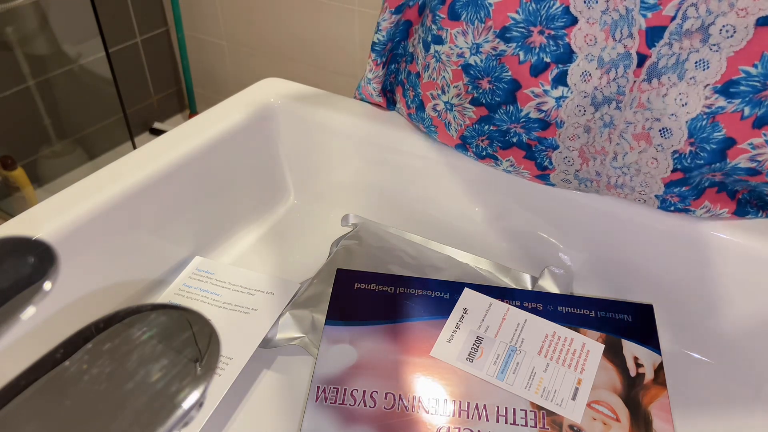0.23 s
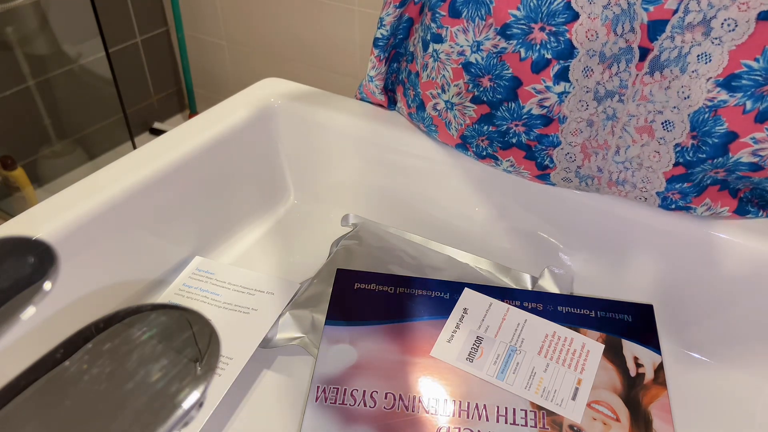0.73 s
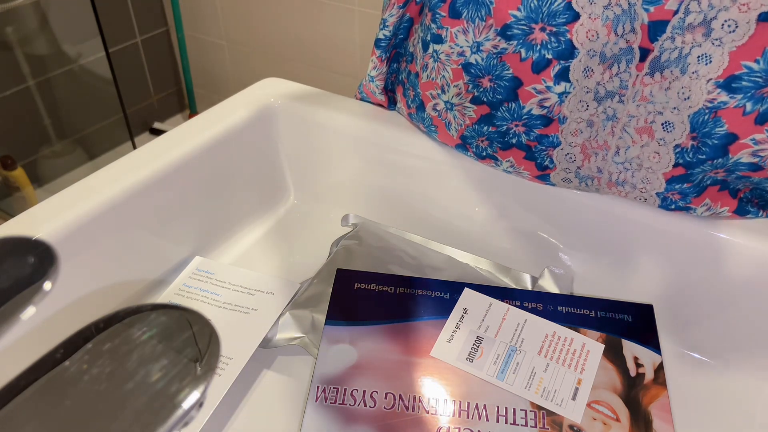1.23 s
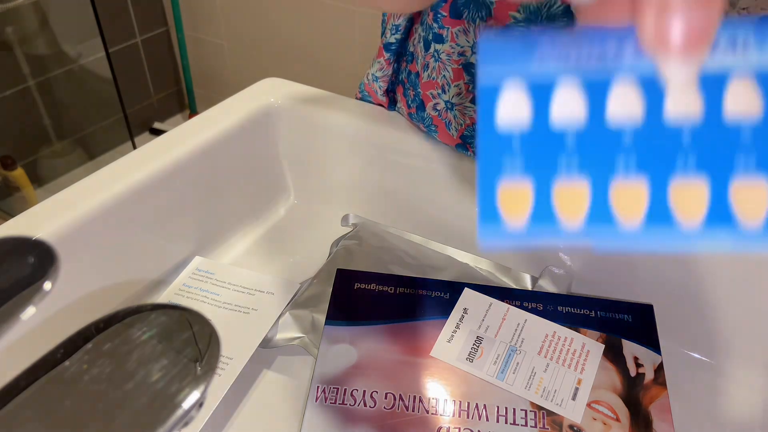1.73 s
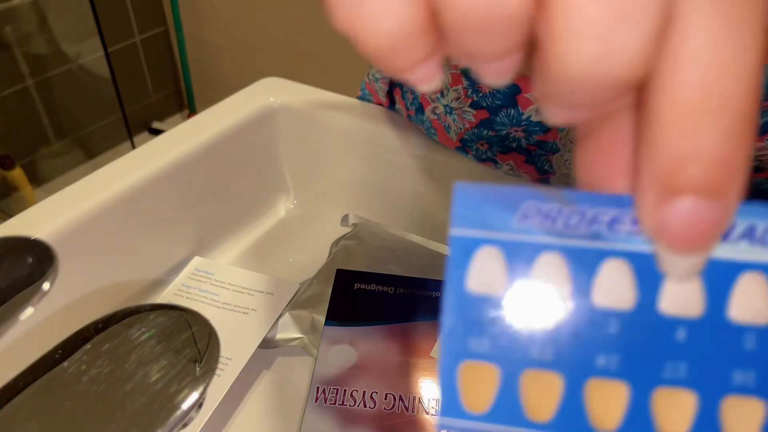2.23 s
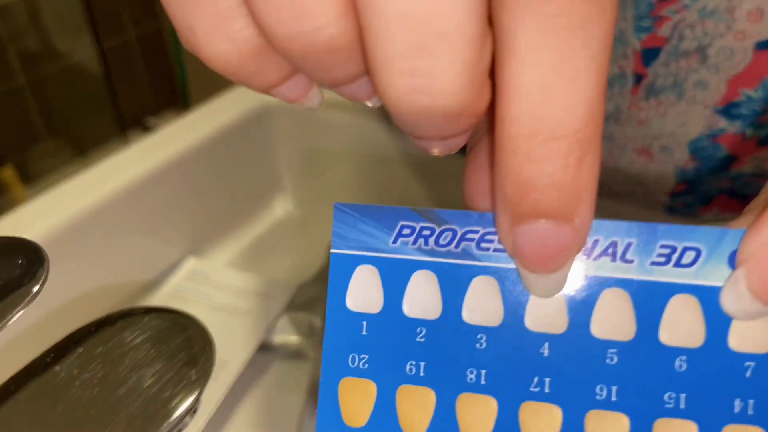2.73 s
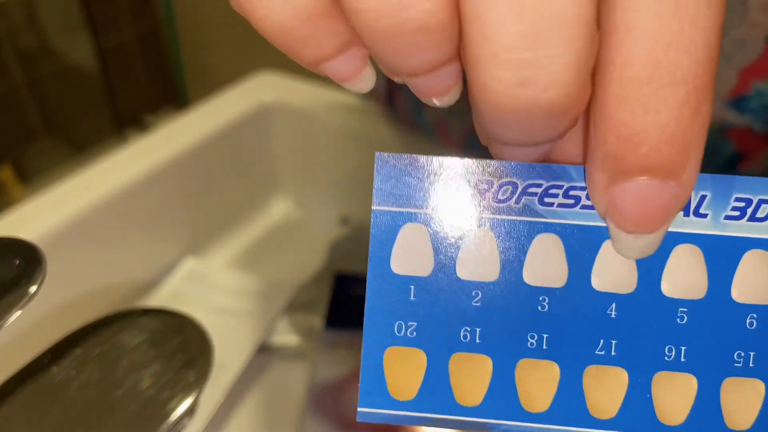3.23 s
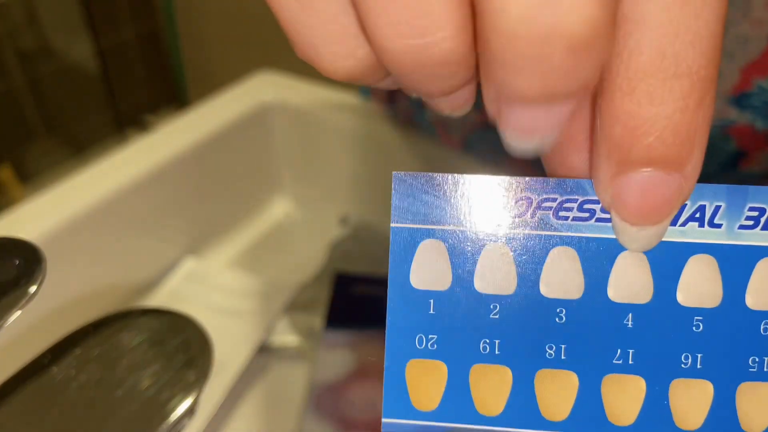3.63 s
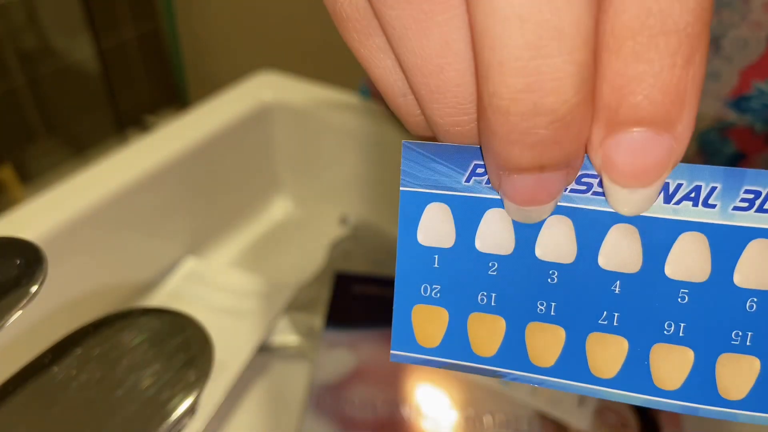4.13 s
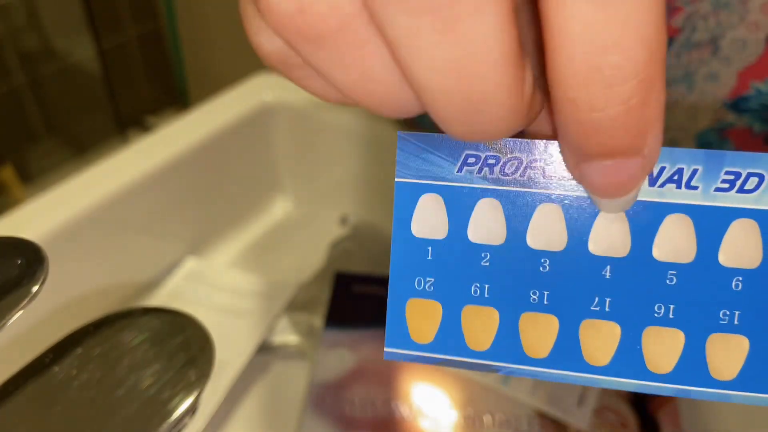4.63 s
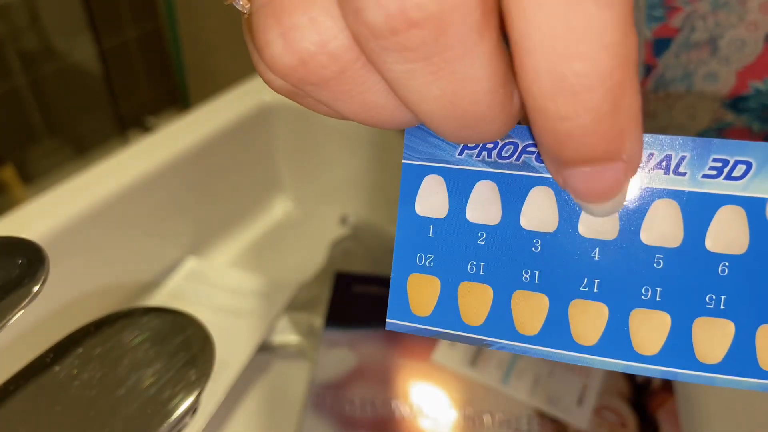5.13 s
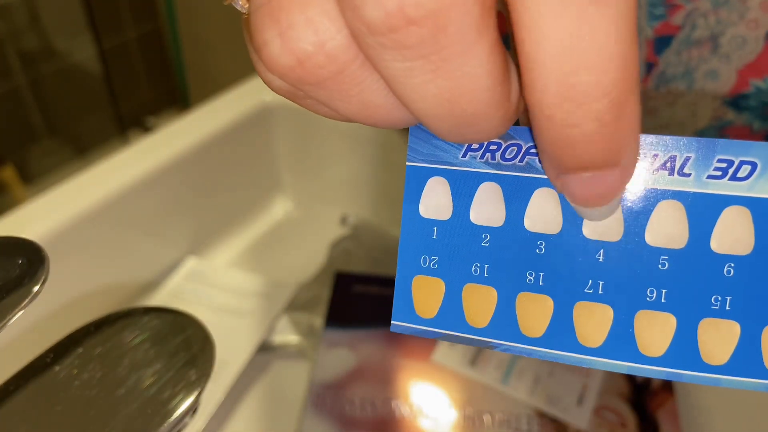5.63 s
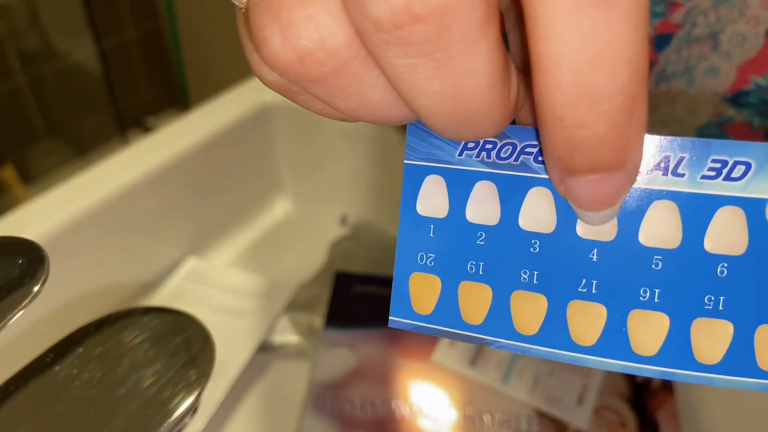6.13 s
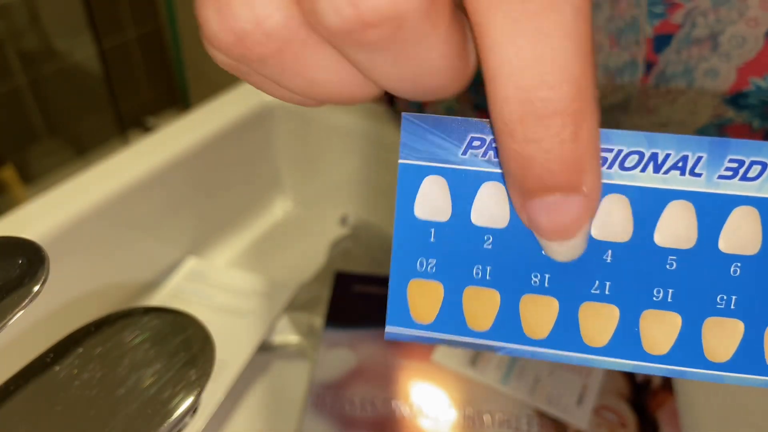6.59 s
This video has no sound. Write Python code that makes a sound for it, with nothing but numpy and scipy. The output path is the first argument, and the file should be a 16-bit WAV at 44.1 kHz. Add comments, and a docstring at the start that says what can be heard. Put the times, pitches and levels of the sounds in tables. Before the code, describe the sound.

An extractor fan runs throughout in a small tiled bathroom: a low, gently fluttering hum, soft rushing air and a faint steady whine. Very near the stereo microphones, skin brushes a thin plastic card in tiny grainy scuffs from 0.1 to 0.8 seconds, with a small tick near 0.45. A lone tick comes at 1.5, a faint rub at 1.7. Around 2.9 to 3.5 there are more sticky ticks and short hisses, then at 3.58 a clicking tap with the heaviest dull knock and low thud. Small crackles follow until 3.9, and brief brighter rubs around 4.0 and 4.3 to 4.5. From 4.86 to 6.2 a fingernail taps eight times, roughly every 0.15 to 0.2 seconds: dry, bright snaps, mostly with faint knocks, the last strongest. The hard walls answer briefly. Light rubbing and ticks at 6.4 to 6.65, then only fan until nearly 7.

```python
"""In a small tiled bathroom an extractor fan rushes and hums: noise rings the room's modes, the blades whine faintly.
Close to a two-microphone recorder, skin slides on a thin plastic card as grainy hiss, with crackling stick-slip ticks.
A nail taps the card ten times, a broadband snap with decaying bending modes; most taps add a duller knock and thud.
The tiles answer the card with decaying noise."""
import sys
import numpy as np
from scipy import signal
from scipy.fft import rfft, irfft, next_fast_len
from scipy.io import wavfile
from scipy.ndimage import uniform_filter1d, map_coordinates

SR = 44100
rng = np.random.default_rng(int(sys.argv[2]) if len(sys.argv) > 2 else 0)


def unload_audio(sound):
    """Save the sound as a 16-bit wav file, at the path given as the first command line argument."""
    columns = np.transpose(np.atleast_2d(sound))
    # keep every value between -1 and 1, then stretch to whole-number steps
    steps = np.round(np.clip(columns, -1, 1) * 32767)
    wavfile.write(sys.argv[1], SR, steps.astype(np.int16))


N = 302289  # length in samples


def amp(db):
    """Decibel law: a level in dB becomes an amplitude ratio."""
    return 10 ** (np.asarray(db) / 20)


def unit(x):
    """Normalization by mean power: x scaled to rms 1."""
    return x / np.sqrt(np.mean(x ** 2) + 1e-20)


def along(points, hz, axis=1):
    """Logarithmic frequency scale: one column of (Hz, value, ..) points interpolated at hz."""
    columns = np.transpose(points)
    return np.interp(np.log(hz + 1), np.log(columns[0] + 1), columns[axis])


def wobble(rate):
    """Band-limited fluctuation: a smooth curve through `rate` random knots a second."""
    knots = rng.standard_normal(int(N * rate / SR) + 4)
    return map_coordinates(knots, [np.arange(N) * rate / SR])


def filtered(x, response):
    """Linear filtering: the spectrum of x times a complex response of frequency."""
    m = next_fast_len(x.shape[-1] + SR // 2)  # room for the filter to ring out
    spectrum = rfft(x, m) * response(np.fft.rfftfreq(m, 1 / SR))
    return irfft(spectrum, m)[..., :x.shape[-1]]


def air(patchy_db=1.5, ripple=0.54):
    """Turbulence noise, partly coherent between the microphones; the tiled walls comb it finely."""
    # Each row: frequency in Hz, left and right level in dB per Hz before patches and comb.
    air_levels = [(27.5, -100, -100), (35.8, -77.5, -79.5), (117, -75, -73), (318, -72.5, -71),
                  (640, -76.5, -82), (1234, -92, -91.5), (2140, -99, -99), (2850, -100, -101),
                  (3580, -105, -106), (4380, -103, -105), (5000, -107, -109), (6240, -110, -111),
                  (6920, -116, -116), (8750, -120, -120), (10800, -118, -118), (12500, -121, -121),
                  (15000, -126, -126), (16200, -140, -140)]
    # Left-right coherence of the air noise. Each row: frequency in Hz, correlation from -1 to 1.
    likeness = [(60, 0.95), (250, 1), (600, -0.44), (1200, -0.42), (1800, -0.14), (2800, 0.35),
                (4500, 0.54), (5600, -0.017)]

    # faint patches of level in time and frequency
    z = signal.stft(rng.standard_normal((2, N)), nperseg=512)[2]
    field = uniform_filter1d(rng.standard_normal(z.shape[1:]), 6, 0)
    field = uniform_filter1d(field, 14, 1)
    pair = signal.istft(z * amp(patchy_db * unit(field)), nperseg=512)[1][:, :N]

    def mid_side(hz):
        angle = np.arccos(np.clip(along(likeness, hz), -1, 1)) / 2
        return np.array([np.cos(angle), np.sin(angle)])

    knots = rng.standard_normal((2, 2000))  # one knot every 12 Hz

    def comb(hz):
        depth_db = 10 * ripple * np.interp(hz, [0, 1500, 6000], [0, 1, .3])
        return amp(depth_db * [np.interp(hz / 12, np.arange(2000), k) for k in knots])

    def colour(hz):
        level = amp([along(air_levels, hz), along(air_levels, hz, axis=2)])
        return level * np.sqrt(SR / 2) * comb(hz)

    mid, side = filtered(pair, mid_side)
    return filtered(np.array([mid + side, mid - side]), colour)


def room_modes():
    """Resonance under random excitation: each mode is narrow noise, with its own level and phase at each microphone."""
    # Each row: frequency in Hz, width in Hz at half amplitude, left and right level in dB,
    # right-channel phase lead in radians.
    modes = [(90, 18, -82, -74, 1), (158.9, 8.3, -54, -52.5, -0.5), (205.1, 11.7, -53.5, -50, -1.34),
             (239, 16, -48, -44.5, 0.72), (274.4, 6.6, -53, -54, 0.52), (305.4, 17, -54.5, -59.5, 1.5),
             (324.9, 21, -57, -46.5, 0), (351.8, 10.4, -62.5, -52.5, 0.2),
             (376.5, 17.4, -53.5, -50.5, -0.63), (401.3, 11, -55, -60, -2), (420.7, 19, -58, -55, -2),
             (451.3, 22, -53.5, -57.5, 0.4), (469.4, 13, -51, -58.5, 0.97), (503.7, 7.1, -54.5, -52, -2.5),
             (528, 21, -52.5, -60.5, 4.5), (565, 38, -56, -64, -2.5), (677.3, 39, -55.5, -57, 1.5),
             (710, 12, -64, -64, 3), (774.6, 75, -55, -55.5, 1.19), (850, 19, -63, -72, -2),
             (885.5, 13, -66, -62.5, 1.5), (954, 14, -62, -63.5, 1.5), (981, 17, -69, -69.5, 1),
             (1096, 51, -66.5, -68.5, 1.5), (1227, 18, -78.5, -80.5, 1.5)]
    # Resonances of the fan housing, columns as above.
    housing = [(1796, 140, -72, -75.5, 0.63), (2483, 110, -74, -76, 0.14), (3020, 81, -86, -84.5, 0.16),
               (4264, 170, -74.5, -81, 0.022), (4655, 41, -81.5, -83, 0.39)]
    m = next_fast_len(N)
    f = np.fft.rfftfreq(m, 1 / SR)[:m // 6]
    total = np.zeros((2, m // 2 + 1), complex)
    for hz, width_hz, left_db, right_db, lead in modes + housing:
        shape = 1 / (1 + (2 * (f - hz) / width_hz) ** 2)
        noise = shape * (rng.standard_normal(len(f)) + 1j * rng.standard_normal(len(f)))
        noise *= m / 2 / np.linalg.norm(shape)  # rms 1
        total[:, :len(f)] += noise * [[amp(left_db)], [amp(right_db) * np.exp(1j * lead)]]
    return irfft(total, m)[:, :N]


def hum(hz, rate, left_db, right_db, lead):
    """Narrow-band noise: a room mode rung by noise is a sine whose size and phase drift together."""
    envelope = wobble(rate) + 1j * wobble(rate)
    ring = envelope * np.exp(2j * np.pi * hz * np.arange(N) / SR)
    return amp([[left_db], [right_db]]) * unit(np.real([ring, ring * np.exp(1j * lead)]))


def tone(hz, wander_hz, left_db, right_db, lead, rate):
    """Frequency modulation: a stereo sine of wandering pitch, its levels rms."""
    phase = 2 * np.pi * np.cumsum(hz + wander_hz * wobble(rate)) / SR
    return np.sqrt(2) * amp([[left_db], [right_db]]) * np.sin([phase, phase + lead])


def fan():
    """Superposition of fan sources: air noise, room modes, two fluttering hums and the blade tone."""
    # Slow level of the two hums. Each row: time in seconds, lower hum in dB, upper hum in dB.
    hum_levels = [(0, -45.5, -42), (1, -44, -40), (1.5, -46, -40.5), (2.7, -48.5, -45), (3.5, -47, -46),
                  (4, -41, -38), (4.6, -45.5, -40), (5.4, -45.5, -43), (6.1, -44.5, -43.5),
                  (6.85, -44, -38.5)]
    # Each row: frequency in Hz, random knots per second, left and right gain in dB,
    # right-channel phase lead in radians.
    hum_tones = [(138.8, 9, -0.5, 0, 0.066), (219.7, 18, -2.5, 1.5, 0.28)]
    # One row: frequency in Hz, pitch wander in Hz, left and right level in dB, right-channel lead in radians.
    blade_tone = (659, 0.6, -49, -54, 1.97)
    t = np.arange(N) / SR
    times, *levels_db = np.transpose(hum_levels)
    hums = sum(amp(np.interp(t, times, db)) * hum(*row) for db, row in zip(levels_db, hum_tones))
    blade = amp(0.3 * wobble(2.8)) * tone(*blade_tone, rate=7.4)
    return air() + room_modes() + hums + blade


def rubs():
    """Stick-slip friction: skin catches and slips on the gloss, a grainy hiss under each stroke."""
    # Each row: start in seconds, length in seconds, level in dB, change in dB per second,
    # top treble in dB above the rest.
    strokes = [(0.117, .12, -77, -2, 0), (0.343, 0.098, -72, -86, -2), (0.445, 0.16, -65, -100, -8),
               (0.683, .1, -76, 0, -1), (1.71, .09, -70.5, -1.5, 3), (2.978, 0.037, -68, -200, 2),
               (3.07, 0.15, -66.5, -120, -2), (3.385, 0.093, -61, 5, -8), (3.477, .085, -67.5, -100, 0),
               (3.975, 0.09, -69.5, -70, 5), (4.32, 0.046, -53, 10, 4), (4.365, .018, -62, -100, -2),
               (4.4, .1, -63.5, -120, 0), (6.428, 0.036, -60.5, 0, 0), (6.462, 0.075, -65, 0, 0),
               (6.534, 0.028, -59, 0, 0), (6.562, .025, -66, -150, 0)]
    # Colour of the hiss. Each row: frequency in Hz, relative level in dB per Hz.
    skin_colour = [(1000, -21.5), (1900, 4.5), (2600, 8), (3200, 3.5), (4500, 6.5), (7000, 0.5), (11500, 1),
                   (15000, 0.5), (17000, -27.5)]
    rise_s, fall_s = .02, 0.0087  # start and end of a stroke
    grit_db, catch_db = 0.5, 1.5  # scatter of the grains' size, unevenness of the pressure
    snags_per_s, snag_size = 400, 7  # tiny snags in the hiss; size relative to the grain

    t, level = np.arange(N) / SR, np.zeros((2, N))
    for s, length, db, db_per_s, top_db in strokes:
        rise = (t - s) / rise_s + .5
        fall = (s + length - t) / fall_s + .5
        contact = np.clip(np.minimum(rise, fall), 0, 1) ** 2
        level += contact * amp(db + db_per_s * np.clip(t - s, 0, length)) * amp([[0], [top_db]])

    grain = amp(grit_db * wobble(500)) * rng.standard_normal(N)
    grain += snag_size * (rng.random(N) < snags_per_s / SR) * rng.standard_normal(N)
    hiss = unit(filtered(grain, lambda hz: amp(along(skin_colour, hz))))
    top = lambda hz: np.clip(hz / 1000 - 12.5, 0, 1)  # crossover centred on 13 kHz
    bands = filtered(hiss, lambda hz: np.array([1 - top(hz), top(hz)]))
    return amp(catch_db * wobble(120)) * (level * bands).sum(0)


def tiles(x):
    """Diffuse reverberation: noise tails decay at a rate set by frequency, a new tail every quarter second."""
    # Each row: frequency in Hz, time in seconds to decay by 60 dB.
    decay = [(500, 0.2), (3000, 0.47), (12000, 0.32)]
    out, step = np.zeros((2, N + SR)), SR // 4
    for start in range(0, N, step):
        hz, t, z = signal.stft(rng.standard_normal((2, SR // 2)), SR, nperseg=256)
        tail = signal.istft(z * amp(-60 * t / along(decay, hz)[:, None]), SR, nperseg=256)[1]
        wet = signal.fftconvolve(x[None, start:start + step], tail / np.linalg.norm(tail[0]), axes=1)
        out[:, start + 150:][:, :wet.shape[1]] += wet  # 150 samples of delay
    return out[:, :N]


def bend(hz):
    """Dispersion of bending waves in the card: the treble arrives first."""
    delay_s = .0007  # at 2500 Hz, falling with the root of frequency; half of it is then taken off everywhere
    return np.exp(-4j * np.pi * delay_s * np.sqrt(2500 * hz) + 2j * np.pi * hz * delay_s / 2)


def ticks():
    """Stick-slip release: skin lets go with a jolt and a short puff of crackle of its own colour and decay."""
    # Each row: time in seconds, level in dB, gain in dB at 3, 11 and 15 kHz relative to 6 kHz,
    # time in seconds to decay by 60 dB.
    releases = [(0.3393, -60.5, -6, 13, 17, 0.027), (0.445, -47, 3, -6, -12, 0.022),
                (1.479, -46, 12, -1, -1, .02), (2.897, -61, 0, 0, 6, .008),
                (3.0638, -41.5, 6, -9, -18, .004), (3.398, -49, 13, -2, -5, .014),
                (3.411, -56, 9, 6, -10, .01), (3.4649, -51, 2, 6, -14, .014), (3.5755, -49, -3, -4, 0, .01),
                (3.578, -36, -3, -5, -12, 0.016), (3.651, -47.5, 4, -1, 8, 0.011),
                (3.6648, -51, -6, -1, 6, .01), (3.8406, -48, 11, -6, -12, .004),
                (3.8592, -50, 16, -6, -22, 0.0055), (4.383, -49, 8, 7, 5, 0.0044),
                (4.424, -53, 14, -1, -1, .01), (6.553, -49, 2, -8, -6, .025), (6.638, -52, 2, -1, -7, .008)]
    jolt = 2.1  # over the rms of the crackle at its start
    out, lead = np.zeros(N + SR), 256  # samples of room ahead of the jolt
    t, hz = np.arange(4096 - lead) / SR, np.fft.rfftfreq(4096, 1 / SR)
    for s, db, low_db, mid_db, high_db, t60 in releases:
        points = [(900, -11), (3000, low_db), (6000, 0.0), (11000, mid_db), (15000, high_db), (17000, -26)]
        colour = amp(along(points, hz))
        crackle = amp(-60 * t / t60) * rng.standard_normal(len(t))
        crackle[0] = jolt
        puff = irfft(rfft(np.pad(crackle, (lead, 0))) * colour * bend(hz))
        out[round(s * SR) - lead:][:len(t) + lead] += amp(db) * puff
    return out[:N]


def taps():
    """Impulsive excitation: a snap with brief crackle, and the card's modes at new strengths for each tap."""
    # Each row: time in seconds, snap level in dB, treble in dB above the snap,
    # then six groups of card modes, low to high, in dB above the snap.
    nail_taps = [(3.5775, -37, -5, -6, -9.5, -3.5, -31, -13, -3),
                 (4.8595, -26, 2.5, -29, -29, -8, -10.5, -14.5, -11),
                 (5.0496, -28, 2, -21.5, -16.5, -8.5, -7.5, -8.5, -11),
                 (5.2483, -28.5, -3, -25.5, -15, -11.5, -11, -10, -20),
                 (5.393, -27.5, -1.5, -23, -16.5, -8, -10, -13, -18),
                 (5.5708, -30.5, -2, -28, -24, -10.5, -10.5, -13, -17),
                 (5.7467, -34, 1.5, -16.5, -21.5, -11.5, -12.5, -10, -9),
                 (5.9, -29.5, -2, -17, -20, -13.5, -12, -10.5, -9.5),
                 (6.061, -28.5, -1.5, -18, -16.5, -12.5, -12, -11, -9),
                 (6.2069, -20.5, -2.5, -20, -18, -15, -13, -15, -17)]
    # Modes of the card. Each row: frequency in Hz, level in dB within its group,
    # time in seconds to decay by 60 dB.
    card_modes = [(1083, 0.5, 0.016), (1840, 6, 0.026), (2320, 4.5, 0.0089), (2580, 5.5, 0.013),
                  (3105, 5.5, 0.0085), (3590, 2, 0.0073), (3960, 5, 0.015), (4370, 4, 0.0067),
                  (4610, 1, 0.008)]
    # Edges between the groups of modes, in Hz.
    group_edges_hz = [2050, 2450, 2900, 3400, 4000]
    # Colour of the snap. Each row: frequency in Hz, gain in dB.
    crack_colour = [(1300, -3), (1800, -0.5), (3000, -3), (4500, 6), (6000, 0), (8000, 3), (9200, 0),
                    (12500, 2.5), (15000, -1), (17000, -18)]

    cracks, rings, t = np.zeros((2, N + SR)), np.zeros(N + SR), np.arange(SR // 20) / SR
    for s, db, treble_db, *groups_db in nail_taps:
        start = round((s + .0011) * SR)
        fade = amp(-13 - 60 * t / .004) + amp(-21 - 60 * t / .022)  # the card shivers after the snap
        crack = fade * rng.standard_normal(len(t))
        crack[8] += 3  # the snap itself
        cracks[:, start:start + len(t)] += amp([[db], [db + treble_db]]) * crack
        for k, (hz, level_db, t60) in enumerate(card_modes):
            group_db = groups_db[np.searchsorted(group_edges_hz, hz)]
            strength_db = db + level_db + group_db + rng.normal(0, 1.5)
            mode_hz = hz * rng.normal(1, .015)  # the grip bends the card
            ring = amp(strength_db - 60 * t / t60) * np.sin(2 * np.pi * mode_hz * t)
            rings[start:][:len(t)] += (-1) ** k * ring

    def colour(hz):
        treble = np.clip(hz / 3000 - 2, 0, 1)  # fades in from 6 to 9 kHz
        return amp(along(crack_colour, hz)) * bend(hz) * [1 - treble, treble]

    return filtered(cracks[:, :N], colour).sum(0) + rings[:N]


def knocks():
    """Structure-borne impact: blows reach the recorder's body as damped modes and a low thud of sagging pitch."""
    # Each row: time in seconds, knock level in dB, thud level in dB.
    blows = [(3.5802, -30, -30.5), (4.8604, -39.5, -51), (5.0501, -39.5, -44), (5.2496, -43.5, -56),
             (5.5722, -49, -56), (5.9002, -46, -56), (6.063, -50, -54), (6.208, -39, -42)]
    # Modes of the knock. Each row: frequency in Hz, level in dB, time in seconds to decay by 60 dB.
    body_modes = [(200, 4, 0.047), (326, -5, 0.015), (490, -2.5, 0.031), (604, 3, 0.024), (800, 3.5, 0.028),
                  (952, -3, 0.045), (1067, -2.5, 0.046), (1290, -6, 0.021), (1620, -5.5, 0.024)]
    settled_hz, sag_hz, sag_s, thud_s = 65, 120, 0.009, 0.047  # final pitch, drop into it, its time, length
    skew = 0.94  # below 1 the thud peaks early
    rise_s = .002  # time constant of the knock's onset

    out, t = np.zeros(N + SR), np.arange(SR // 4) / SR
    thud_hz = settled_hz + sag_hz * np.exp(-t / sag_s)
    swell = np.sin(np.pi * np.clip(t / thud_s, 0, 1) ** skew) ** 2
    thud = swell * np.sin(2 * np.pi * np.cumsum(thud_hz) / SR)
    for s, knock_db, thud_db in blows:
        knock = np.zeros(len(t))
        for k, (hz, db, t60) in enumerate(body_modes):
            level = amp(db + rng.standard_normal() - 60 * t / t60)  # 1 dB of scatter
            knock += (-1) ** k * level * np.sin(2 * np.pi * hz * t)
        knock *= 1 - np.exp(-t / rise_s)
        out[round(s * SR):][:len(t)] += amp(knock_db) * knock + amp(thud_db) * thud
    return out[:N]


def scene():
    """Superposition of direct and reverberant sound: the card is close, mostly louder left; the fan fills the room."""
    # Paths from the card to the two microphones round the recorder's body.
    # Each row: frequency in Hz, left over right in dB, right-channel phase lead in radians.
    paths = [(1030, -6, -2.5), (1740, 10, -1), (2560, 8.5, -0.5), (3430, 6, -1.5), (3980, 6.5, 2.5),
             (5100, 7.5, 1), (6050, 6, 1), (6720, 20, 0)]

    def ports(hz):
        right = amp(-along(paths, hz)) * np.exp(1j * along(paths, hz, axis=2))
        return np.array([np.ones(len(hz)), right])

    card = taps() + ticks() + rubs()
    return filtered(card[None], ports) + amp(-16.0) * tiles(card) + knocks() + fan()


def record(dry):
    """Channel mixing and band limiting: above 6.3 kHz both channels carry mostly the left, the right turned in phase."""
    split_hz, in_step_hz, turn_hz = 6300, 6950, 4300  # crossover, equal phase, spacing of one full turn
    top_hz = 16700  # band limit
    high = lambda hz: np.clip((hz - split_hz) / 400 + .5, 0, 1)
    lead = lambda hz: 2 * np.pi * (hz - in_step_hz) / turn_hz
    shared = dry[:1] + [[.2], [-.2]] * dry[1:]
    treble = filtered(shared, lambda hz: high(hz) * np.exp([0 * hz, 1j * lead(hz)]))
    edge = lambda hz: np.clip((top_hz - hz) / 300, 0, 1) ** 2
    return filtered(filtered(dry, lambda hz: 1 - high(hz)) + treble, edge)


dry = scene()
out = record(dry)
unload_audio(out)
```